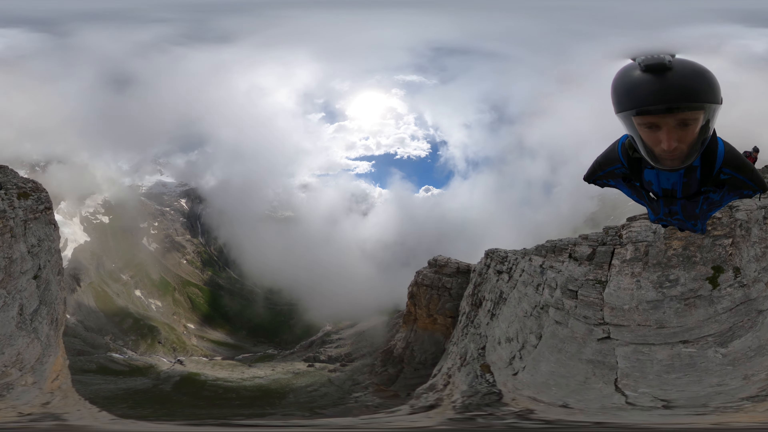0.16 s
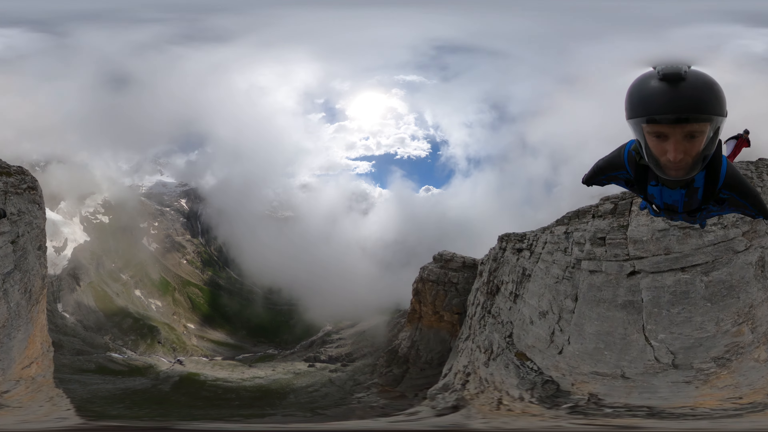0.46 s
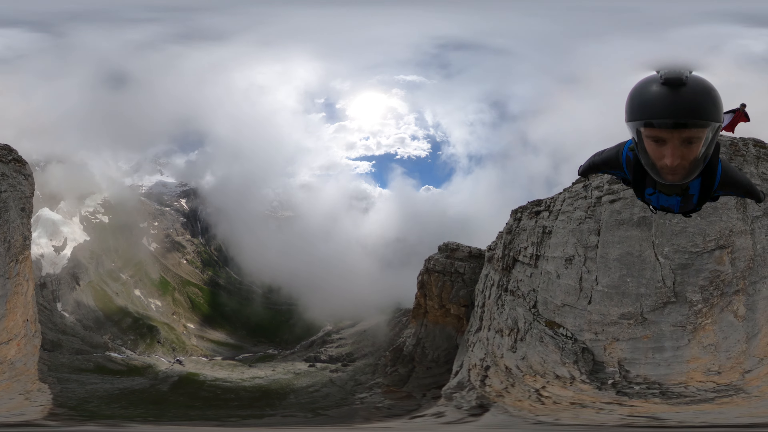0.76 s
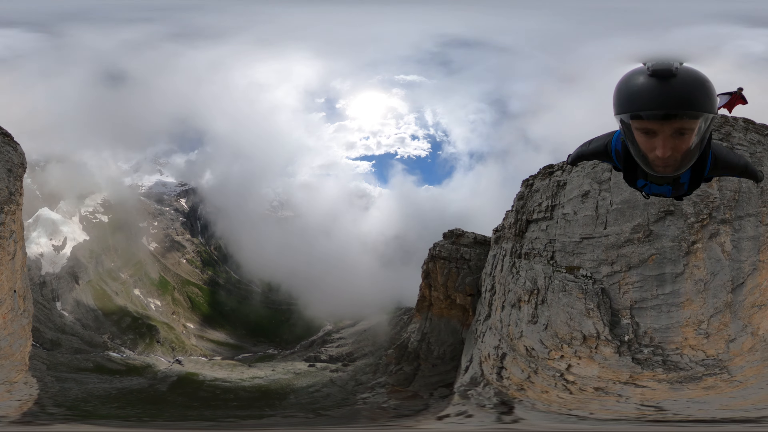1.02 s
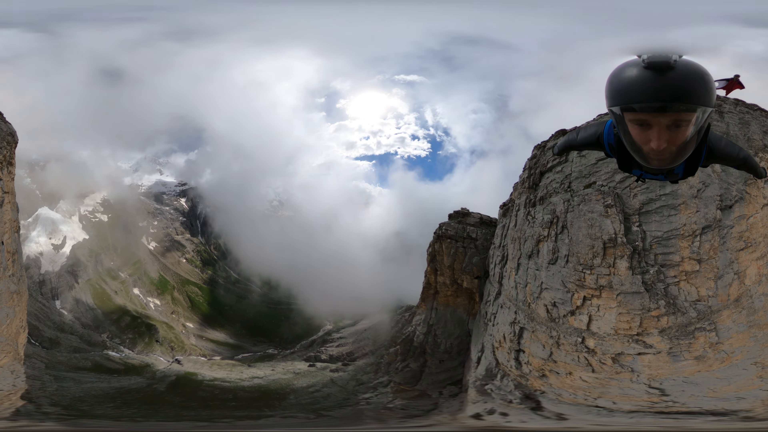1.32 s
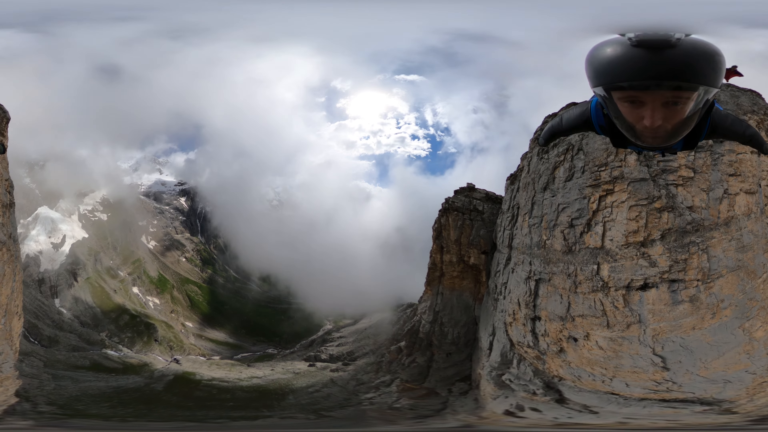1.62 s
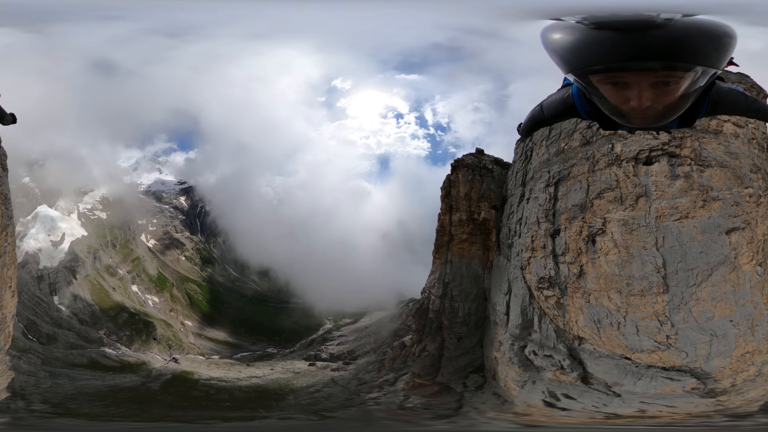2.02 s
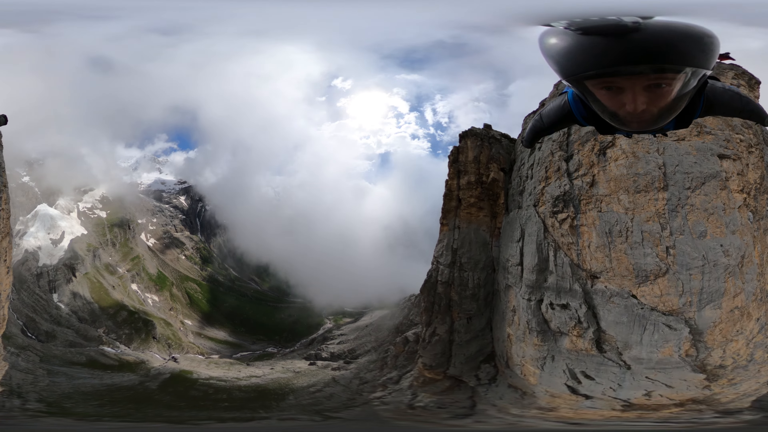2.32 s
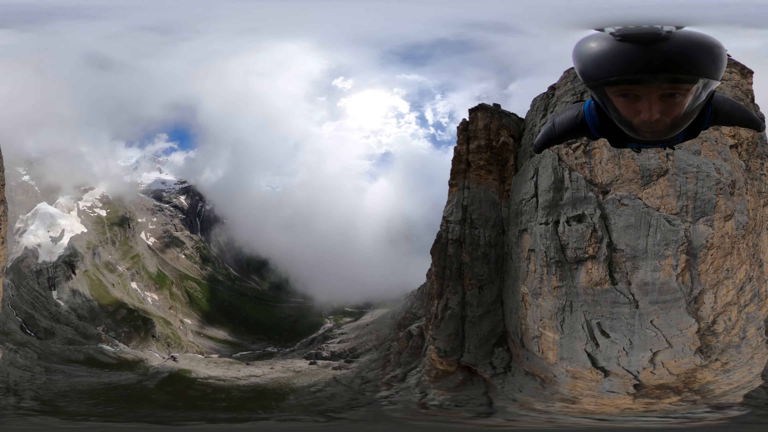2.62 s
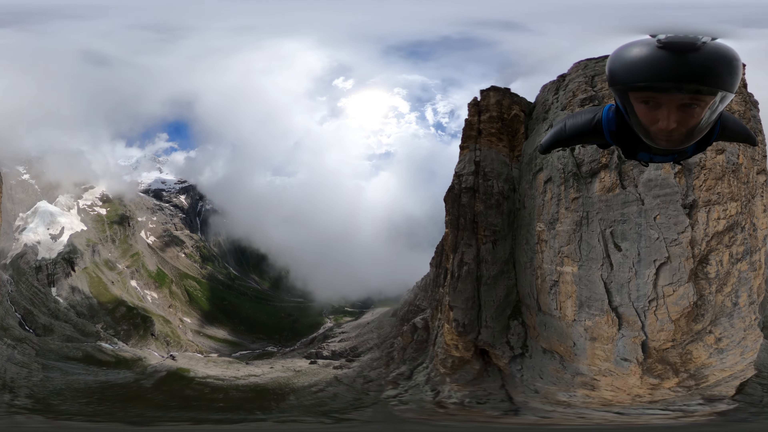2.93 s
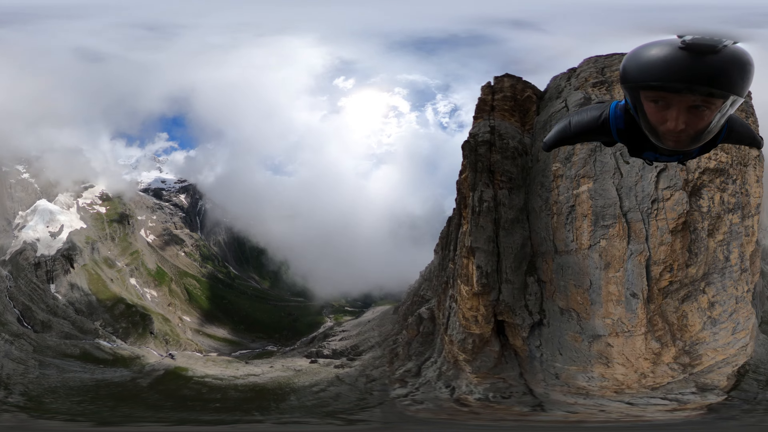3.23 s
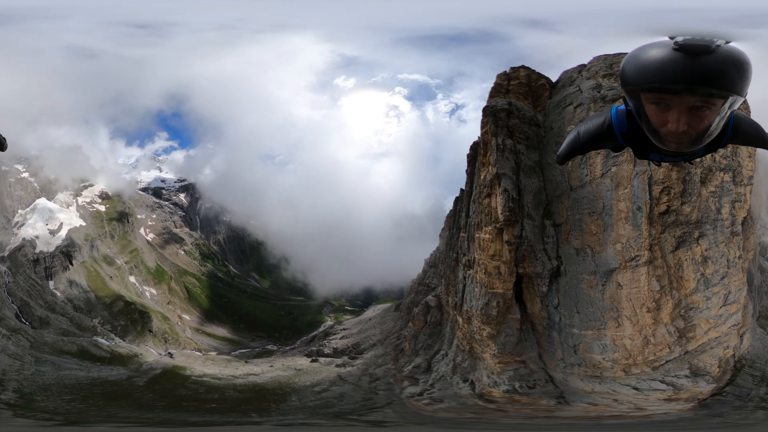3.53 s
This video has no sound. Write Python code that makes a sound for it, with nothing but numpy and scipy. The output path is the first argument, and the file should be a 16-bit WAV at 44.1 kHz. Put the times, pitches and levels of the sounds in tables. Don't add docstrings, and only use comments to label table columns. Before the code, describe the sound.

Wind rushing past a falling jumper, growing louder and brighter with heavy low microphone buffeting

```python
import sys
import numpy as np
from scipy import signal
from scipy.io import wavfile
from scipy.ndimage import uniform_filter1d

SR = 44100
rng = np.random.default_rng(int(sys.argv[2]) if len(sys.argv) > 2 else 0)


def put_to_file(sound):
    columns = np.atleast_2d(sound).T
    safe = np.clip(columns, -1, 1)
    whole_steps = np.round(safe * 32767)
    wavfile.write(sys.argv[1], SR, whole_steps.astype(np.int16))


def voltage_ratio(level):
    return 10 ** (np.asarray(level, float) / 20)


N = 161406
STEP = 64

# t/s, buffet level/dB, eddy speed/octaves
PORT_FLOW = [(0, -40.5, -0.6), (.12, -30.5, -0.5), (.2, -37, -2.5), (.3, -33.5, 0.06), (.49, -23, -0.84),
             (.8, -21.5, -0.48), (1.17, -22, -0.11), (1.3, -24.5, 0.015), (1.45, -17, -0.33),
             (1.6, -19, 0.31), (1.9, -16.5, 0.07), (2.25, -17.5, 0.26), (2.6, -22, 0.38),
             (2.8, -24.5, 0.07), (2.97, -24.5, 0.18), (3.15, -21, 0.77), (3.5, -20.5, 0.5),
             (3.66, -22.5, 0.17)]
# t/s, length/s, level gain/dB, eddy speed-up/octaves
PORT_GUSTS = [(.733, 0.035, 4.5, 0.68), (0.455, 0.047, 3, 0.18), (1.001, 0.05, 2.5, 0.45),
              (1.087, 0.057, 4, 0.43), (1.207, 0.086, 3, 0.067), (1.638, .012, 0.5, .3),
              (1.669, .012, 2, .4), (1.71, .015, 0.5, .3), (2.574, 0.025, 0, 0.28), (1.542, 0.038, 3, 0.11),
              (2.006, 0.046, 3, 0.53), (2.323, 0.06, 8, 1), (2.385, 0.056, 6.5, 0.78),
              (2.446, 0.025, 3, 0.79), (2.536, 0.18, 5.5, .6), (2.639, 0.041, 4, 0.33),
              (2.721, 0.026, 12, 0.85), (2.757, 0.034, 0.5, .01), (0.797, .05, 1.5, -0.084),
              (1.053, 0.03, -1.5, 0.16), (2.25, 0.026, 1.5, 0.62), (2.429, 0.033, -1.5, -0.11),
              (0.906, .05, 0, .1), (1.345, .05, 1, .1), (1.79, .04, 1, .2), (2.153, .03, -1, .2),
              (2.222, .03, 0.5, .3), (3.118, .03, -2, .2), (3.457, .03, -0.5, .2), (2.865, 0.065, 5, .01),
              (2.91, 0.081, 3, 0.29), (3.206, 0.04, 3.5, 1), (3.264, 0.05, 5.5, 0.4),
              (3.346, 0.073, 6, 0.4), (3.411, 0.015, 2, .1), (3.661, 0.05, 8, 0.28)]
# f/Hz, density/dB per Hz
EDDY_SPECTRUM = [(12, 0), (30, -2.5), (70, 1), (130, -5.5), (250, -13), (450, -26.5), (800, -52.5),
                 (1600, -67)]
# t/s, rush level/dB, speed/0 slow to 1 fast
AIR_SPEED = [(0, -45.5, 0.37), (.15, -43.5, 0.19), (.3, -47, 0.19), (.42, -45, 0.21), (.6, -42.5, .05),
             (.8, -44.5, 0.064), (1.4, -41.5, 0.22), (1.75, -39, 0.51), (2.0, -37, 0.65),
             (2.35, -36.5, 0.64), (2.7, -35, 0.8), (2.95, -33, 0.82), (3.25, -30, 0.8), (3.45, -32, 0.92),
             (3.66, -30.5, 0.83)]
# f/Hz, density/dB per Hz
SLOW_AIR = [(150, 9.5), (600, -0.5), (1000, -3.5), (1800, -7.5), (3000, -14.5), (5000, -27.5), (7500, -38),
            (13000, -43.5)]
# f/Hz, density/dB per Hz
FAST_AIR = [(150, -0.5), (600, -2.5), (1000, -6), (1800, -12), (3000, -12), (5000, -12), (7500, -13),
            (13000, -31.5)]
# f/Hz, density/dB per Hz
SCUFF_SPECTRUM = [(130, -3), (345, 1), (520, -4), (980, -9.5), (1440, -16.5), (5000, -34.5), (8800, -50),
                  (14000, -66.5)]
# t/s, length/s, level/dB
GRAVEL_TRICKLES = [
    (.125, 0.012, -56.5),
    (.19, 0.083, -64),
    (.3, 0.082, -61),
]
# t/s, level/dB, brightness/Hz
PEBBLE_SNAPS = [
    (0.04, -37.5, 1435),
    (0.055, -42.5, 5110),
    (.061, -36, 2500),
    (0.073, -34, 1200),
    (0.083, -33, 1600),
    (0.099, -30, 1300),
    (0.116, -42, 2500),
    (0.2088, -34, 2880),
]
# t/s, level/dB, f/Hz, t60/s
GEAR_TICKS = [
    (.057, -47, 6100, 0.0073),
    (.082, -50, 13100, 0.0078),
    (.118, -66, 13900, .012),
    (0.2094, -47, 2420, 0.013),
    (.2105, -33, 744, 0.026),
]
# t/s, level/dB
BUCKLE_RING = [(.11, -150), (.125, -100), (.155, -73), (.175, -74), (.19, -90), (.21, -83), (.24, -105),
               (.26, -150)]
# t/s, peak/dB, width/s, way/1 push or -1 pull
PORT_SLAPS = [(0.732, -24, 0.0025, 1), (1.618, 1, 0.0013, 1), (1.634, -43, 0.0016, 1),
              (1.673, -20.5, 0.001, -1), (1.714, -7, 0.0012, 1), (1.997, -24, 0.00061, -1),
              (2.196, -11, 0.0025, 1), (2.299, -12, .001, 1), (2.32, -18, 0.0005, -1),
              (2.335, -1.5, 0.00038, -1), (2.383, -16, 0.0011, -1), (2.518, -13.5, 0.0036, 1),
              (2.531, -7, 0.00099, -1), (2.722, -14, 0.0018, -1), (3.186, -8, .001, 1),
              (3.201, -10.5, 0.00099, 1), (3.21, -10.5, 0.003, -1), (3.271, -3, 0.0055, 1),
              (3.308, -7, .003, 1), (3.345, -13.5, 0.0031, 1), (3.359, -1.5, 0.00066, 1),
              (3.385, -9.5, 0.011, -1)]


def rms_one(x):
    return x / np.sqrt(np.mean(x ** 2) + 1e-20)


def in_time(rows):
    s, *columns = np.transpose(rows)
    t = np.arange(N // STEP + 2) * STEP / SR
    return [np.interp(t, s, column) for column in columns]


def fine(v):
    return np.interp(np.arange(N) / STEP, np.arange(len(v)), v)


def at_hz(points, hz):
    f, db = np.transpose(points)
    return np.interp(np.log(hz), np.log(f), db)


def drift(rate_hz):
    r = np.exp(-2 * np.pi * rate_hz * STEP / SR)
    white = rng.standard_normal(N // STEP + 502)
    return rms_one(signal.lfilter([1], [1, -2 * r, r * r], white)[500:])


def filtered(x, order, hz, kind):
    return signal.sosfilt(signal.butter(order, hz, kind, fs=SR, output="sos"), x)


def bump(t, centre_s, length_s):
    return np.exp(-(2 * (t - centre_s) / length_s) ** 2)


def bands(first_hz, count, source):
    edges = first_hz * 2 ** (np.arange(count + 1) / 3)
    for k, (low, high) in enumerate(zip(edges, edges[1:])):
        yield np.sqrt(low * high), filtered(source[k % len(source)], 3, [low, high], "band")


def evened(x, hz):
    cycles, evenness = 5, 0.7
    power = uniform_filter1d(x ** 2, int(cycles / hz * SR)) / np.mean(x ** 2)
    return x / (power + 0.067) ** (evenness / 2)


def buffet():
    lump_db, lump_octaves, lumps_per_s = 0.8, 0.06, 19.3
    spread = 0.73
    peakiness = 0.13
    level_db, speed = in_time(PORT_FLOW)
    t = np.arange(len(speed)) * STEP / SR
    lump = drift(lumps_per_s)
    for s, length, gain_db, faster in PORT_GUSTS:
        gust = bump(t, s, length)
        level_db = level_db + gain_db * gust
        speed = speed + faster * gust
    scale = 2 ** (speed + lump_octaves * lump)
    gain = voltage_ratio(level_db + lump_db * lump + 23.5) / scale ** spread
    settle = SR // 2
    white = rng.standard_normal((2, N + settle))
    swirl = np.zeros(N)
    for hz, band in bands(9.976, 25, white):
        band_db = at_hz(EDDY_SPECTRUM, hz / scale) + 0.66 * drift(6.3)
        swirl += fine(voltage_ratio(band_db)) * evened(band, hz)[settle:]
    return fine(gain) * swirl * (1 + peakiness * np.abs(rms_one(swirl)))


def rush():
    level_db, fast = in_time(AIR_SPEED)
    level_db = level_db + 11.5 + 0.25 * drift(7) + 0.33 * drift(34)
    hiss = np.zeros(N)
    for hz, band in bands(99.16, 22, rng.standard_normal((2, N))):
        colour_db = (1 - fast) * at_hz(SLOW_AIR, hz) + fast * at_hz(FAST_AIR, hz)
        hiss += fine(voltage_ratio(colour_db + level_db + 0.75 * drift(5))) * band
    return hiss


def scuff():
    peak_s, rise_s, fall_s, level_db, grit_per_s = 0.098, 0.044, 0.018, -32, 3200
    n = SR // 2
    t = np.arange(n) / SR
    hits = (rng.random(n) < grit_per_s / SR) * rng.standard_normal(n)
    hits *= voltage_ratio(2.7 * np.minimum(rng.exponential(1, n), 4))
    grit = hits + 0.32 * rng.standard_normal(n)
    crunch = rms_one(sum(voltage_ratio(at_hz(SCUFF_SPECTRUM, hz)) * band
                         for hz, band in bands(131.6, 21, grit[None])))
    gravel = rms_one(filtered(crunch, 4, 3500, "high"))
    age = t - peak_s
    press = np.exp(-np.where(age < 0, (age / rise_s) ** 2 / 2, age / fall_s))
    out = voltage_ratio(level_db) * crunch * press
    for s, length, db in GRAVEL_TRICKLES:
        out += gravel * voltage_ratio(db) * bump(t, s, length)
    return np.pad(out, (0, N - n))


def pebbles():
    decay_s, rise_s = 0.0032, 0.0006
    out, age = np.zeros(N), np.arange(1024) / SR
    shape = np.exp(-age / decay_s) * (1 - np.exp(-age / rise_s))
    for s, db, hz in PEBBLE_SNAPS:
        snap = rms_one(filtered(rng.standard_normal(len(age)), 3, [350, hz], "band"))
        out[int(s * SR):][:len(age)] += voltage_ratio(db) * snap * shape
    return out


def gear():
    buckle_hz, onset_s = 13692, 0.00054
    t = np.arange(N) / SR
    out = voltage_ratio(fine(in_time(BUCKLE_RING)[0])) * np.sin(2 * np.pi * buckle_hz * t)
    for s, db, hz, t60 in GEAR_TICKS:
        age = np.maximum(t - s, 0)
        decay = voltage_ratio(db - 60 * age / t60)
        out += decay * np.sin(2 * np.pi * hz * age) * np.minimum(age / onset_s, 1)
    return out


def slaps():
    t, out = np.arange(N) / SR, np.zeros(N)
    for s, db, width, way in PORT_SLAPS:
        near = slice(int((s - 6 * width) * SR), int((s + 6 * width) * SR))
        u = ((t[near] - s) / width) ** 2
        out[near] += np.sign(way) * voltage_ratio(db) * (1 - 0.5 * u) * np.exp(-u / 2)
    return out


def roar():
    centre_s, length_s, level_db, centre_hz, half_width_octaves = 3.205, 0.47, -38.5, 1320, 0.7
    edges = centre_hz * 2 ** (half_width_octaves * np.array([-1, 1]))
    band = rms_one(filtered(rng.standard_normal(N), 2, edges, "band"))
    flutter = voltage_ratio(level_db + 0.24 * fine(drift(18)))
    return flutter * band * bump(np.arange(N) / SR, centre_s, length_s)


def scene():
    port_cut_hz, top_hz, leak_db = 8000, 13660, -14
    air = rush()
    through_port = filtered(air, 8, port_cut_hz, "low")
    leak = voltage_ratio(leak_db) * filtered(air, 10, top_hz, "low")
    wind = buffet() + through_port + leak + slaps() + roar()
    return (wind + scuff() + pebbles() + gear())[None]


def band_limit(x):
    return signal.sosfilt(signal.butter(12, 15700, fs=SR, output="sos"), x)


def record(dry):
    threshold_db, window_s, ratio = -11, 0.016, 0.3
    overload, offset = 0.78, 0.0033
    level_db = 10 * np.log10(uniform_filter1d(dry ** 2, int(window_s * SR), axis=1) + 1e-12)
    x = dry * voltage_ratio(-ratio * np.maximum(level_db - threshold_db, 0))
    mix = overload * np.tanh(x / overload) + offset
    return band_limit(mix)


dry = scene()
out = record(dry)
put_to_file(out)
```